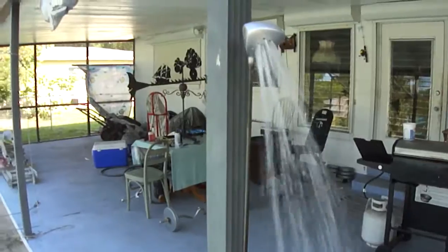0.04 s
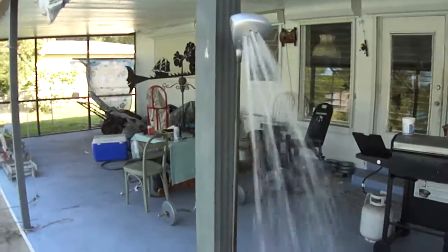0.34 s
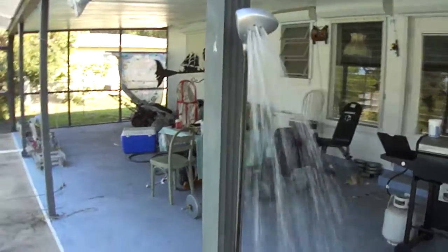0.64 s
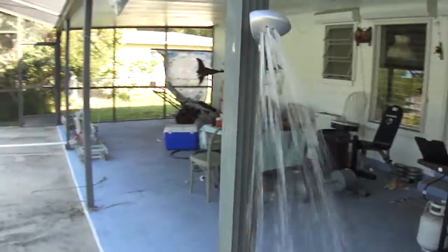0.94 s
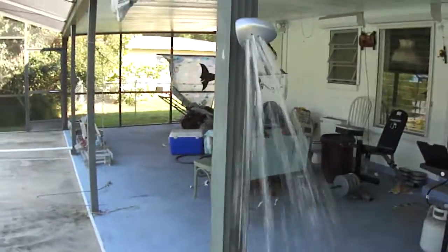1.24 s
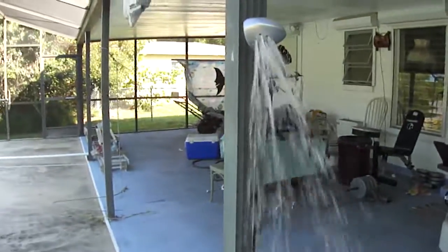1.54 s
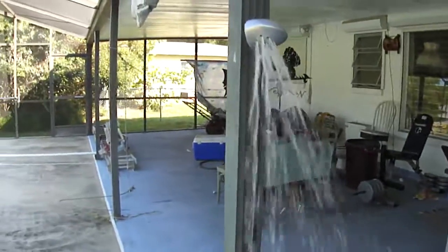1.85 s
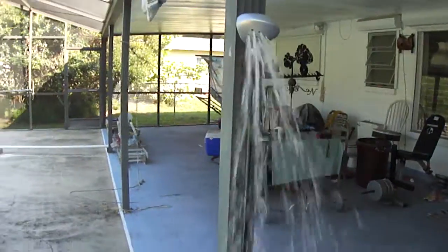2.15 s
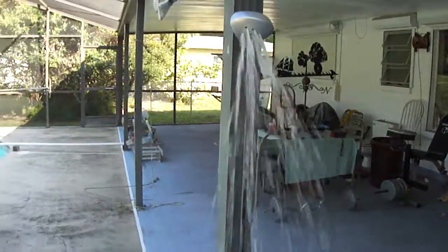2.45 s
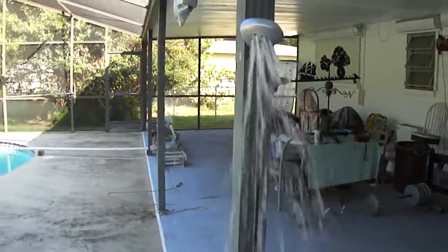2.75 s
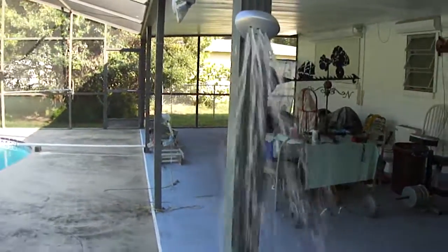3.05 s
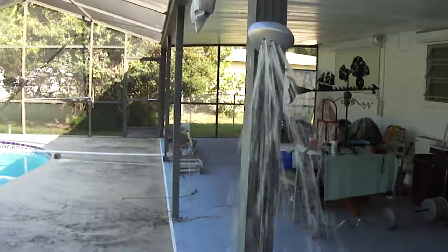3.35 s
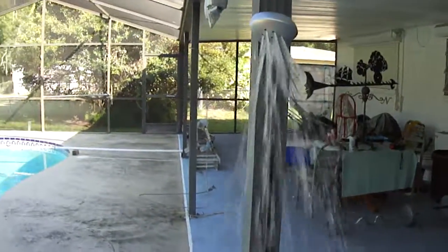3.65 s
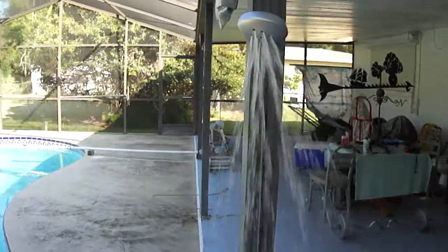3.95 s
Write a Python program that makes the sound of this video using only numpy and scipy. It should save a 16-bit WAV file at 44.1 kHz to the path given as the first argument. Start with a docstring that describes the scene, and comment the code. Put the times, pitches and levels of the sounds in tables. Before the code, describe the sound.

Water hisses from a close shower head and splatters unevenly on a concrete patio.

```python
"""An outdoor shower runs close by under a patio roof, and roof and walls answer briefly.
From the start the jets hiss, turbulence rings the head and pipe, and water strikes wet concrete:
countless fine droplets, clumps of larger ones and single fat drops that smack.
Within the first second the spray dips slightly and a faint motor hum swells behind it.
After two seconds the hum recedes; the spray, its timbre slowly drifting, ends a little louder."""
import sys
import numpy as np
from scipy import signal
from scipy.fft import rfft, irfft, next_fast_len
from scipy.io import wavfile
from scipy.ndimage import map_coordinates

SR = 44100
rng = np.random.default_rng(int(sys.argv[2]) if len(sys.argv) > 2 else 0)


def wav_out(sig):
    """Save sig, one row per channel (or a flat mono array), as 16-bit PCM at SR to the path in sys.argv[1]."""
    wavfile.write(sys.argv[1], SR, np.round(np.clip(np.atleast_2d(sig).T, -1, 1) * 32767).astype(np.int16))


N = 176400

# Reverberation time of the patio: f/Hz, T60/s
PATIO_DECAY = [(300, 0.5), (3000, 0.44), (10000, 0.22)]
# Partials of the motor: f/Hz, level/dB
HUM_PARTIALS = [(118, -75.5), (177, -69.5)]
# Slow gain on those partials: t/s, level/dB
HUM_ENVELOPE = [(0, -9), (.5, -1), (.9, 5), (2.2, 4), (2.9, -1), (4, -5)]
# Resonances of head and pipe: f/Hz, width/Hz, start level/dB, end level/dB
HEAD_MODES = [(441, 29, -60.5, -59), (985, 42, -57.5, -53), (1396, 55, -51, -51), (1480, 61, -48.5, -47),
              (1599.4, 20, -50.5, -47.5), (1660, 23, -53.5, -63), (1693, 28, -52.5, -61),
              (1837, 22, -56, -63), (2113, 16, -61, -57), (2192, 26, -59, -60), (2226, 23, -59.5, -54),
              (3240, 95, -51, -47), (3510, 44, -49, -44), (3730, 98, -40.5, -48.5), (6800, 270, -39.5, -54)]
# Spectral shape of the jets: f/Hz, start level/dB, end level/dB
JET_SPECTRUM = [(30, -36, -44), (45, -32, -34), (98, -21.5, -21), (198, -16.5, -16), (390, -12, -15.5),
                (673, -8.5, -7), (1130, -8.5, -9.5), (1700, -11.5, -5.5), (2010, -10.5, -14),
                (2870, -8.5, -8.5), (3350, -3, -6.5), (3900, -6, 1), (4570, -8, -8), (5370, -5, -0.5),
                (6400, -4.5, -9.5), (7640, -4.5, 2.5), (7830, -0.5, 1.5), (8660, -10, -12), (9500, -2, 0.5),
                (10330, -1.5, -2.5), (11160, -10, -16)]
# Slow gain on jets and patter: t/s, level/dB
FLOW_ENVELOPE = [(0, 0.7), (.7, -1), (1.3, 0.1), (1.8, 0.36), (2.4, 0.8), (2.9, 0.1), (3.2, 1), (3.6, 1.3),
                 (4, 1.3)]
# Impacts of fat drops on the concrete: t/s, level/dB, f/Hz
FAT_DROPS = [(0.0942, -10.5, 6300), (0.1754, -9.5, 6800), (0.2071, -13.5, 4000), (0.2392, -14, 7000),
             (0.3037, -11, 4600), (0.3404, -7, 4100), (0.3637, -7.5, 8050), (0.46, -15, 3650),
             (0.4795, -5.5, 4080), (0.55, -10, 5700), (0.5882, -10.5, 4200), (0.7139, -12, 6000),
             (0.8172, -9, 3650), (0.8258, -11, 5750), (0.9133, -8.5, 4400), (0.9262, -15, 4030),
             (0.934, -13.5, 3560), (1.0633, -8.5, 4900), (1.0713, -12, 3420), (1.1452, -13.5, 3620),
             (1.2038, -12, 4480), (1.2146, -11, 5270), (1.2172, -10.5, 5840), (1.2342, -9.5, 3750),
             (1.2463, -10, 4250), (1.2526, -10, 5350), (1.2754, -12, 4060), (1.3407, -15.5, 3750),
             (1.4919, -5, 6860), (1.496, -13, 5700), (1.528, -16, 5600), (1.535, -12, 3850),
             (1.561, -19, 5200), (1.6833, -5, 5700), (1.7497, -12.5, 4140), (1.7572, -10.5, 4200),
             (1.8064, -13, 4990), (1.8414, -16, 4070), (1.8652, -16, 5570), (1.926, -7, 3980),
             (1.948, -8, 7740), (2.028, -8, 3600), (2.0321, -9, 4430), (2.0816, -9.5, 5400),
             (2.1034, -10.6, 6739), (2.1381, -16, 4980), (2.266, -15, 5250), (2.3182, -15, 4350),
             (2.322, -7, 8111), (2.3793, -11.5, 4440), (2.5005, -8.5, 5250), (2.5251, -9, 5400),
             (2.5521, -7.5, 3300), (2.5732, -6.5, 2930), (2.6041, -13, 4300), (2.6226, -8, 6960),
             (2.6834, -15, 3830), (2.7885, -11.5, 4450), (2.825, -9.5, 5000), (2.8849, -9, 4540),
             (2.9059, -10, 4750), (2.9254, -15, 4770), (2.9412, -14, 5030), (2.9875, -13, 5250),
             (3.0123, -15, 3670), (3.0433, -12, 3500), (3.046, -8, 5200), (3.3313, -12.5, 3670),
             (3.421, -14, 4750), (3.442, -12, 3930), (3.505, -11.5, 4700), (3.5136, -9, 3330),
             (3.5192, -5.5, 6700), (3.5226, -11.5, 4030), (3.5903, -13, 4320), (3.5996, -9, 5700),
             (3.603, -10, 3530), (3.6137, -8, 5240), (3.6398, -12.5, 4900), (3.7512, -6, 3960),
             (3.8528, -10, 4140), (3.881, -8.5, 3140), (3.8862, -13, 4440), (3.9225, -12, 4650),
             (3.989, -12.5, 3680)]
# Bass cut on all impacts: f/Hz, level/dB
IMPACT_RESPONSE = [(40, -48), (200, -4.5), (2000, -4.5), (3100, -0.5)]

DROP_CYCLES, DROP_RISE_CYCLES = 0.77, 0.46  # decay and rise of a smack
PLIP_HZ, PLIP_WIDTH, PLIP_CYCLES = 3560, 0.25, 0.39  # longer ring near this pitch; width in ln f
SPLASH_DB, SPLASH_S, SPLASH_SPREAD = -13, 0.0018, 0.23  # fragments: gain, delay scale, spread in ln f
TICK_DB, TICK_HZ = -3.5, 7560  # first contact of a fat drop
CLUMPS_PER_S, SIZE_LIMIT = 70, 2.08  # patter; the largest drop lies SIZE_LIMIT * size_db above the least


def amp(db):
    """Amplitude ratio of a level in decibels."""
    return 10 ** (np.asarray(db) / 20)


def unit(x):
    """Normalisation to rms 1."""
    return x / np.sqrt(np.mean(x ** 2) + 1e-20)


def along(points, hz):
    """Interpolation of (f/Hz, value) points on a logarithmic frequency axis."""
    f, v = np.transpose(points)
    return np.interp(np.log(hz + 1), np.log(f + 1), v)


def wobble(rate):
    """Spline interpolation of random knots, rate a second, at rms 1."""
    return unit(map_coordinates(rng.standard_normal(4096), [np.arange(N) * rate / SR], mode="wrap"))


def filtered(x, response):
    """Linear filtering: the spectrum of x times a frequency response."""
    m = next_fast_len(N + SR // 2)
    return irfft(rfft(x, m) * response(np.fft.rfftfreq(m, 1 / SR)), m)[:N]


def noise(response):
    """Spectral shaping of white noise, at rms 1."""
    return unit(filtered(rng.standard_normal(N), response))


def patio(x):
    """Reverberation: reflections from roof and walls decay exponentially, the treble soonest."""
    hz, t, spectrum = signal.stft(rng.standard_normal(SR // 2), SR, nperseg=256)
    decay = amp(-60 * t / along(PATIO_DECAY, hz)[:, None])
    tail = signal.istft(spectrum * decay, SR, nperseg=256)[1]
    return signal.fftconvolve(x, np.pad(tail, (SR // 200, 0)) / np.linalg.norm(tail))[:N]


def motor():
    """Periodic vibration: two faint partials, made unsteady by slight phase modulation."""
    t = np.arange(N) / SR
    hum = sum(amp(db) * np.sqrt(2) * np.sin(2 * np.pi * hz * (t + 0.00055 * wobble(2.78)))
              for hz, db in HUM_PARTIALS)
    return hum * amp(np.interp(t, *np.transpose(HUM_ENVELOPE)))


def shower_head(flicker_db=1.5):
    """Resonance: turbulence excites narrow modes of head and pipe, each flickering on its own."""
    sound = np.zeros(N)
    for hz, width, start_db, end_db in HEAD_MODES:
        level_db = np.linspace(start_db, end_db, N) + flicker_db * wobble(22)
        sound += amp(level_db) * noise(lambda f: 1 / (1 + ((f - hz) / (0.59 * width)) ** 2))
    return sound


def jets():
    """Flow noise: the spray's fluttering hiss passes from one spectrum to another at equal power."""
    hz, start_db, end_db = np.transpose(JET_SPECTRUM)
    first, last = (noise(lambda f: amp(along(np.c_[hz, db], f))) for db in (start_db, end_db))
    blend = np.linspace(0, 1, N)
    hiss = np.sqrt(1 - blend) * first + np.sqrt(blend) * last
    flutter_db = 0.51 * wobble(11) + 1.07 * wobble(90)
    return hiss * amp(flutter_db)


def smacks(times, gains, hz):
    """Damped oscillation: each impact radiates a wavelet of a few cycles; the longer ones plip."""
    samples = np.arange(160)
    cycles = hz[:, None] * samples / SR
    life = DROP_CYCLES + PLIP_CYCLES * np.exp(-(np.log(hz / PLIP_HZ) / PLIP_WIDTH) ** 2)
    envelope = (1 - np.exp(-(cycles / DROP_RISE_CYCLES / 2) ** 2)) * np.exp(-cycles / life[:, None])
    envelope /= envelope.max(axis=1, keepdims=True)
    waves = envelope * np.sin(2 * np.pi * (cycles + rng.random((len(hz), 1))))
    at = np.abs(times * SR).astype(int)[:, None] + samples
    return np.bincount(at.ravel(), (gains[:, None] * waves).ravel(), N)[:N]


def patter(per_s, pitch_hz, log_spread, size_db, clumping):
    """Shot noise of rms 1: the streams break up unevenly, so drops, mostly small, land in clumps."""
    arrivals = np.cumsum(np.exp(clumping * wobble(CLUMPS_PER_S)))
    when, size_rank, up, down = rng.random((int(per_s * N / SR), 4)).T
    times = np.searchsorted(arrivals, when * arrivals[-1]) / SR
    size = -np.log(1 - size_rank * (1 - np.exp(-SIZE_LIMIT)))  # truncated exponential distribution
    hz = pitch_hz * np.exp(log_spread * np.sqrt(2 * np.pi) * (up - down))
    return unit(smacks(times, amp(size_db * size), hz))


def fat_drops(fragments=3):
    """Impact and splash: each drop smacks with a bright tick, and its fragments land just after."""
    times, db, hz = np.transpose(FAT_DROPS)
    sound = smacks(times, amp(db), hz)
    sound += smacks(times, amp(db + TICK_DB), np.full(len(times), TICK_HZ))
    for _ in range(fragments):
        delay = SPLASH_S * (.2 + rng.exponential(size=len(times)))
        size, pitch = rng.standard_normal((len(times), 2)).T
        sound += smacks(times + delay, amp(db + SPLASH_DB + 2 * size), hz * np.exp(SPLASH_SPREAD * pitch))
    return sound


def scene():
    """Superposition: jets and patter share one slow envelope, and only the impacts reverberate."""
    swell = amp(np.interp(np.arange(N) / SR, *np.transpose(FLOW_ENVELOPE)))
    steady = amp(-31) * swell * jets() + shower_head() + motor()
    fat = fat_drops()
    fine = amp(-33.5) * patter(per_s=750, pitch_hz=7550, log_spread=0.26, size_db=6, clumping=.35)
    coarse = amp(-38.5) * patter(per_s=330, pitch_hz=4370, log_spread=0.14, size_db=5.5, clumping=.45)
    impacts = filtered(fat + swell * (fine + coarse), lambda f: amp(along(IMPACT_RESPONSE, f)))
    return (steady + impacts + amp(-11.5) * patio(impacts))[None]


def record(dry):
    """Band limiting: a steep low-pass removes everything above 11120 Hz."""
    return filtered(dry[0], lambda f: np.clip((11120 - f) / 150, 0, 1))[None]


dry = scene()
out = record(dry)
wav_out(out)
```